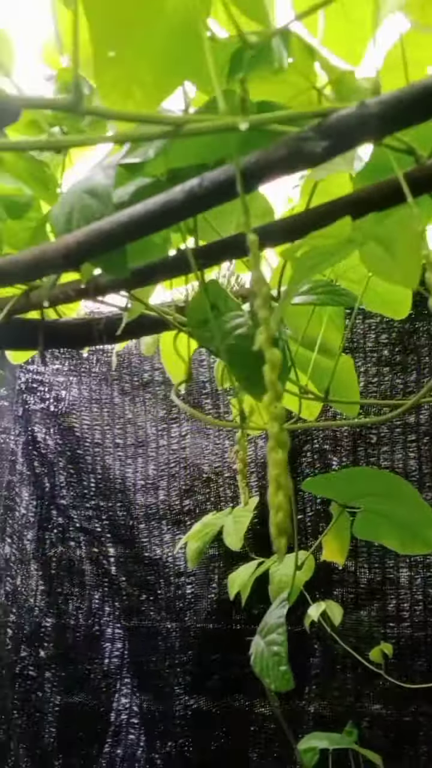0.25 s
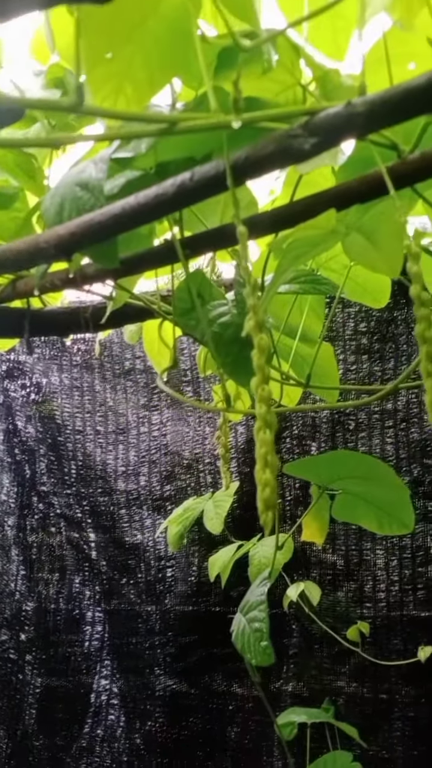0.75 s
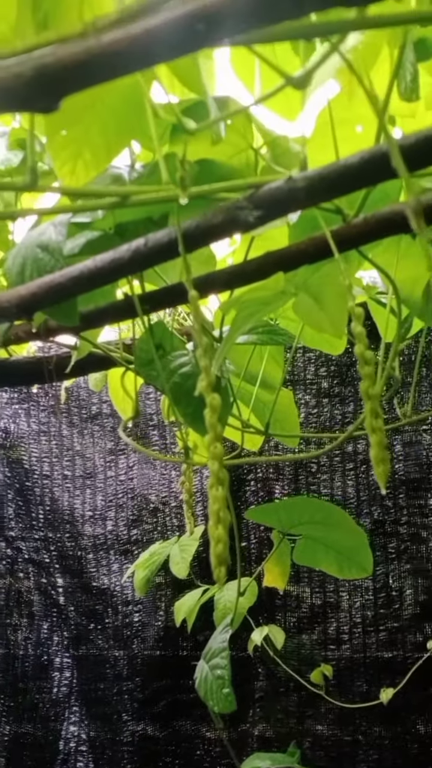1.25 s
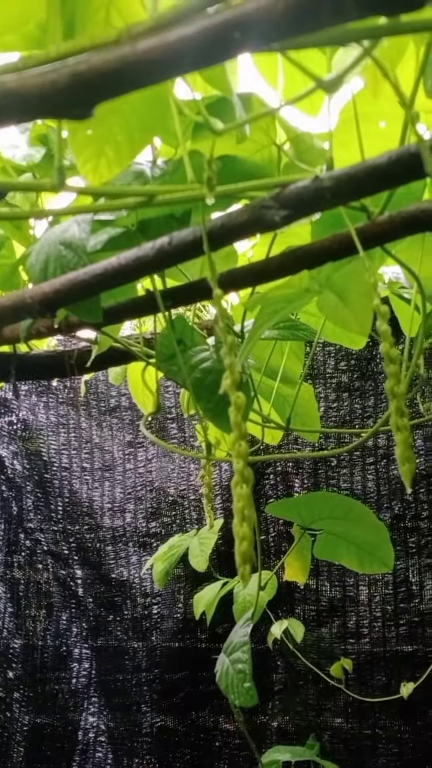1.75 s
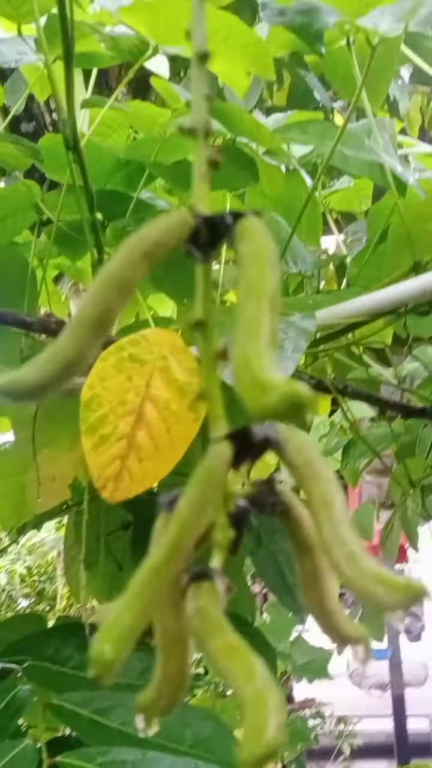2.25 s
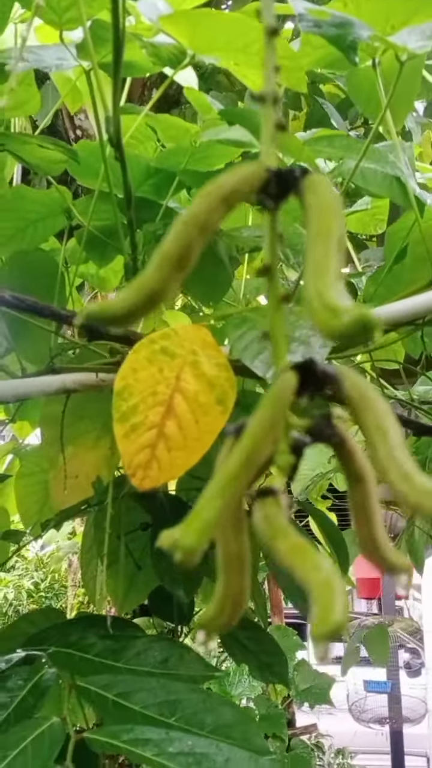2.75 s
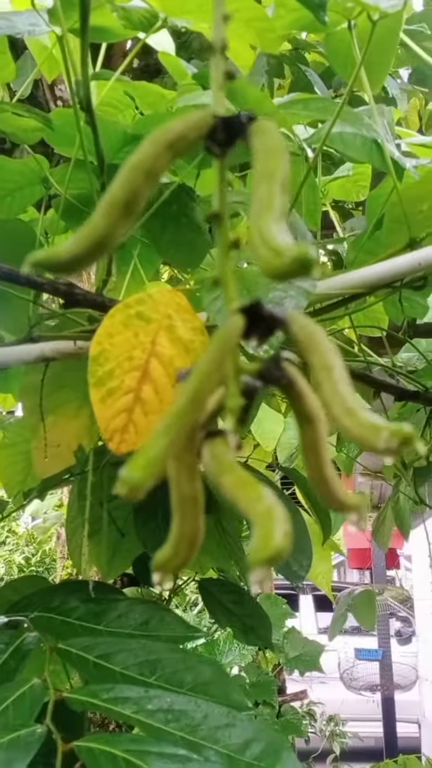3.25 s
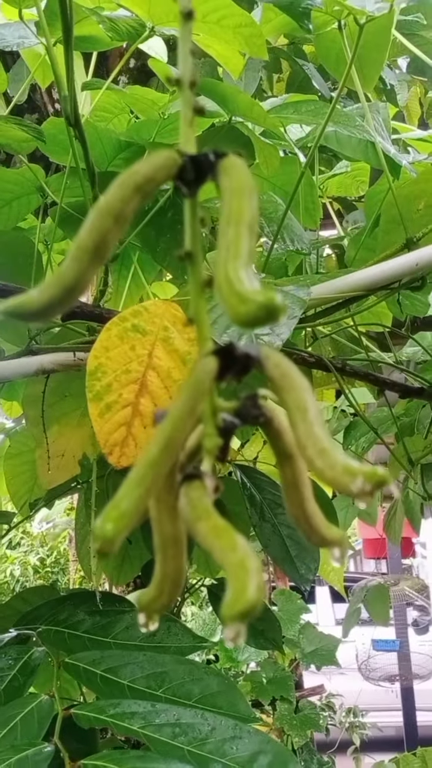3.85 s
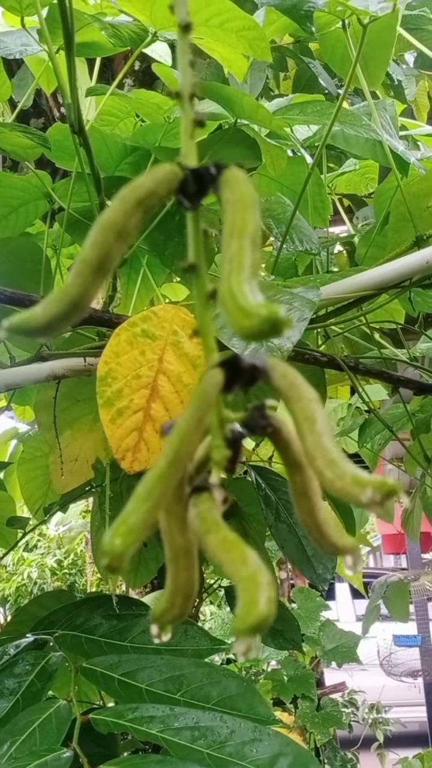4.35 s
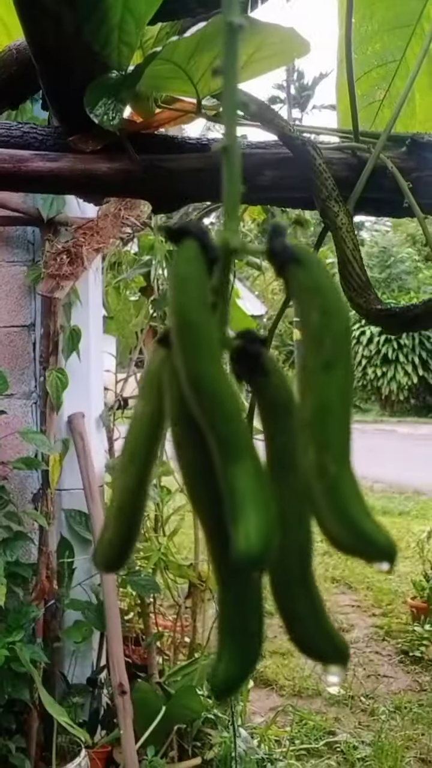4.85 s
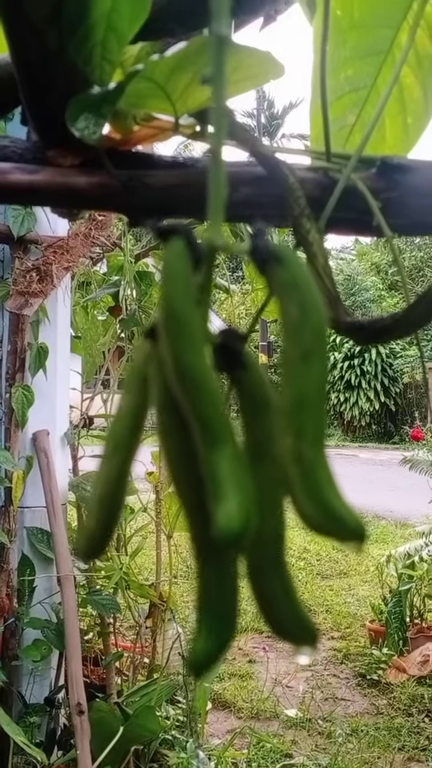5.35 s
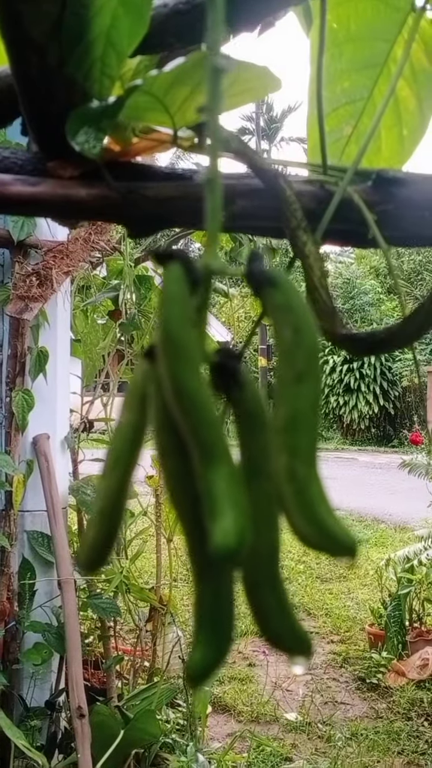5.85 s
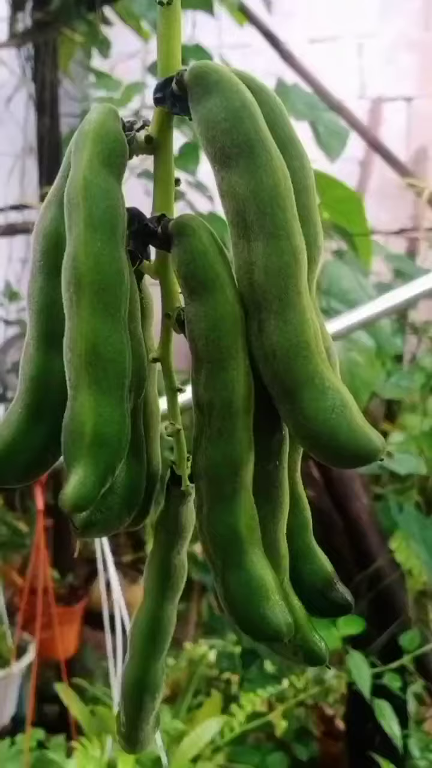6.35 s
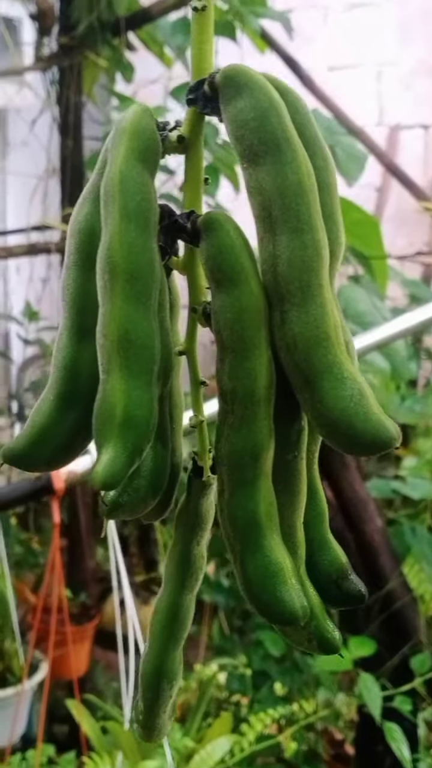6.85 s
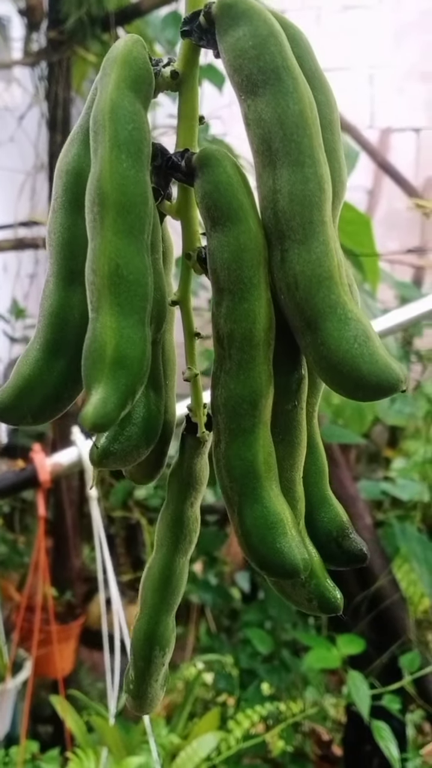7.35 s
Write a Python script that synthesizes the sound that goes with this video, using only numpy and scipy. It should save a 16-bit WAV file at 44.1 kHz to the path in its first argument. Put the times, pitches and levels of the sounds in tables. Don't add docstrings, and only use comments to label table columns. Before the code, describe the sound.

A quiet outdoor garden begins with a thin, high simmer of far insects and barely audible peeps. At about 0.8 s a near cricket starts a very fast, shrill, steady trill, around 6.6 kHz, dominating until everything cuts dead at 1.9 s. After about 0.2 s of silence the sound fades back quickly, the trill slightly softer. Far birds scold in short raspy bursts from 2.6 to 3.7 s, then clear sliding whistles chirp until the cut near 4.4 s. From 4.6 s closer rasping scolds come quickly, with a swooping, trilled warble at 5.1 s, whistles, and a faint sagging rooster crow until about 5.7 s. Another gap falls at 6.2 s. From 6.4 s scolds and whistles resume, a second warble sounds at 7 s, a faint low motor hum pulses, and the cricket stops around 7.4 s, before the end at 7.7 s.

```python
import sys
import numpy as np
from scipy import signal
from scipy.io import wavfile
from scipy.ndimage import uniform_filter1d

SR = 44100
rng = np.random.default_rng(int(sys.argv[2]) if len(sys.argv) > 2 else 0)


def int16_out(signal):
    q = np.round(np.clip(np.atleast_2d(signal).T, -1, 1) * 32767)
    wavfile.write(sys.argv[1], SR, q.astype(np.int16))


def invert_db(level):
    return 10 ** (np.asarray(level, dtype=float) / 20)


N = 335160

# start t/s, end t/s, background level/dB, traffic rumble level/dB
TAKES = [
    (-1, 1.912, -80.5, -81),
    (2.104, 4.3717, -81, -86),
    (4.618, 6.178, -81, -80),
    (6.435, 7.7, -80, -84),
]
# main arrival t/s, last stroke t/s, stroke rate/Hz, carrier f/Hz, octave level/dB
TRILLS = [
    (.8054, 1.95, 38.987, 6640, 5),
    (2.1097, 4.4, 38.987, 6630, -3),
    (4.6199, 6.2, 38.88, 6660, -7),
    (6.4501, 7.44, 38.945, 6650, -5),
]
# delay/ms, level/dB, half width/ms
ARRIVALS = [
    [(-.5, -0.5, 1.6), (4.0, -1.5, 2.2), (10.5, -8.5, 1.7), (17.5, -8.5, 1.2), (21.0, -16, 1.5)],
    [(-3.9, -4, 1.7), (0, 0, 1.4), (4.5, -3, 1.6), (13, -8, 1.6), (16.5, -7, 1.8)],
    [(-9.5, -10, 1.4), (-5.5, -4.5, 1.9), (.3, 0, 2.16), (5.5, -7, 1.9), (10.5, -11.5, 1.8)],
    [(.1, 0, 2.77), (7.2, -2.5, 1.2), (12.4, -9, 1.4), (18.2, -7, 1.5), (21.4, -7.5, 1.3)],
]
# t/s, level/dB
CRICKET_LEVEL = [(.8, -45.5), (1.1, -44), (1.75, -42), (1.9, -43), (2.1, -47.5), (3, -46), (5.4, -46),
                 (6.2, -46), (7.4, -48)]
# t/s, length/s, from f/Hz, to f/Hz, peak level/dB
FALLS = [(0.984, .085, 2130, 2027, -72), (1.63, 0.095, 1850, 1730, -75.5), (2.95, .1, 1020, 900, -81),
         (3.826, .011, 3250, 2550, -52.5), (4.67, 0.033, 3535, 3230, -57.5), (4.76, .07, 2520, 2150, -66.5),
         (7.097, .025, 2300, 2100, -69), (4.136, 0.049, 2320, 2150, -58), (4.868, .045, 2453, 1900, -59.5),
         (4.912, .05, 1786, 1670, -68.5), (5.505, .082, 2996, 1900, -43), (5.563, .055, 897, 729, -57.5),
         (5.584, .155, 760.6, 660.6, -57), (5.791, 0.055, 2293, 2007, -54),
         (6.529, 0.032, 3480, 3050, -59.5), (6.731, .055, 2406, 1704, -57.5),
         (7.359, 0.042, 2960, 2510, -57), (4.04, .08, 3094, 2503, -47.5)]
# t/s, length/s, from f/Hz, to f/Hz, peak level/dB
RISES = [(4.013, 0.037, 2780, 3090, -49), (3.804, .025, 2880, 3320, -52.5), (4.181, .06, 2510, 2940, -44),
         (4.33, 0.068, 3000, 3531, -43), (4.363, .016, 3700, 4150, -46.5),
         (4.637, 0.049, 3250, 3550, -49.5), (4.958, 0.039, 1660, 1720, -60),
         (5.728, .08, 1950, 2310, -54.5), (6.013, .09, 2250, 2595, -49), (6.497, 0.043, 3280, 3466, -53.5),
         (6.565, .065, 2100, 2460, -56.5), (7.146, .016, 4000, 4290, -62), (6.963, 0.013, 3200, 3900, -62)]
# t/s, length/s, from f/Hz, to f/Hz, peak level/dB
SLIDES = [
    (.94, .06, 2250, 2120, -81.5),
    (1.38, .13, 2540, 2070, -78),
    (3.16, .22, 7450, 8400, -69),
    (3.769, 0.043, 2810, 2970, -57.5),
    (4.06, 0.084, 2966, 2250, -49.5),
    (7.375, .062, 2750, 1760, -56),
    (4.7, 0.063, 2000, 2560, -62.5),
    (6.781, .11, 1647, 1862, -64),
]
# t/s, length/s, f/Hz, peak level/dB
PEEPS = [(.1, .5, 5230, -93), (.275, .07, 3630, -71), (.35, .11, 3580, -76), (.44, .075, 3880, -77.5),
         (.525, .06, 3870, -83), (6.62, .025, 3420, -64), (6.6, .11, 2470, -62), (6.52, .1, 3440, -58.5),
         (4.75, 0.033, 2520, -60), (4.93, .07, 1450, -71.5), (1.2, .11, 3640, -83), (2.14, 0.18, 3400, -85),
         (4.62, .22, 3900, -79), (4.762, .045, 1490, -63.5), (4.865, .08, 1480, -66), (4.9, .045, 825, -67),
         (5.14, .06, 625, -82.5), (5.685, 0.037, 1590, -70.5), (5.882, 0.041, 2920, -55),
         (6.438, .05, 2960, -73), (6.46, .04, 1920, -79), (6.05, .18, 2614, -46.5),
         (1.495, 0.091, 2110, -76)]
# t/s, swoop level/dB, trill level/dB, trill growth/(dB/s), trill depth f/Hz, swoop head level/dB
WARBLES = [
    (5.113, -38, -42, -21, 310, -7.5),
    (6.973, -39, -65.5, 59.5, 270, -3),
]
# t after start/s, centre f/Hz, share of depth, level/dB
TRILL_PATH = [
    (.063, 3017, .1, 0),
    (.08, 2840, .55, 1),
    (.11, 2754, .95, -3),
    (.14, 3001, 1.1, -1),
    (.175, 3330, .8, 2.5),
    (.195, 3340, .6, -14.5),
]
# t/s, peak level/dB, throat f/Hz, chest level/dB, top level/dB
SCOLDS = [(4.7351, -43, 5460, -14, -54), (4.8516, -40.5, 4770, -5, -49), (5.1058, -37, 5860, -13, -51),
          (5.2134, -41, 4360, -16, -43.5), (5.347, -40.5, 5620, -20, -51), (5.441, -37, 5630, -26, -49),
          (5.5444, -36.5, 5800, -21, -45), (5.6764, -38.5, 5750, -16.5, -54),
          (5.7968, -33, 5650, -24, -39.5), (5.8844, -33, 6050, -21, -38), (5.9833, -37, 4400, -18.5, -42.5),
          (6.11, -38, 5990, -23, -49), (6.4667, -51, 5600, -23, -43), (6.564, -42.5, 5640, -16.5, -51),
          (6.6478, -43.5, 6150, -23, -49), (6.7551, -40.5, 5740, -21.5, -51.5)]
# t/s, peak level/dB, throat f/Hz, chest level/dB, low level/dB
FAR_SCOLDS = [(2.614, -50.5, 4450, -12, -22), (3.0974, -50.5, 4140, -16.5, -15.5),
              (3.1986, -59.5, 3640, -4, -11.5), (3.3049, -54, 3530, -6, -13.5),
              (3.3862, -52.5, 4520, -8, -11), (3.4644, -48.5, 4570, -8.5, -20),
              (3.5444, -48.5, 4200, -7, -14.5), (3.6506, -47.5, 4270, -6.5, -20),
              (4.135, -51.5, 5100, -11, -30.5), (4.17, -48.5, 5500, -9, -30.5)]
# f/Hz, level/dB, f/Hz, level/dB
THROATS = [(3800, -3.5, 5100, -9), (6060, -3, 3230, -4), (5940, 0, 5170, -9), (5045, -5, 4440, -6),
           (5900, 0.5, 4110, -2), (5291, -2, 5980, -5), (5960, -4, 5180, -6), (3820, -0.5, 5960, -6),
           (4410, -2, 6500, -3.5), (4400, -2.5, 3600, -4), (4800, -7, 6030, -14), (5200, -0.5, 5820, -1.5),
           (5380, -3.5, 4930, -6), (4880, -1.5, 6500, -4), (4890, 0.5, 4000, -7), (4940, -7.5, 4370, -10),
           (4790, -3, 3700, -12.5), (3900, -4, 4350, -6), (4400, -6, 4860, -8), (4800, -5.5, 5430, -8),
           (6100, 2, 5700, -2.5), (5350, -7, 4400, -11.5), (4650, -5, 3300, -17), (6100, -7, 5400, -14),
           (5510, -4, 4810, -10.5), (4300, -9, 5400, -9)]
# middle t/s, level/dB, low f/Hz, high f/Hz, half length/s
RUSTLES = [(0.33, -79.5, 3900, 5000, .07), (4.76, -63.5, 3350, 3600, .07), (1.24, -83, 3700, 5000, .07),
           (2.22, -75.5, 3120, 3800, 0.067), (2.197, -76.5, 4300, 5100, .06),
           (2.77, -71.5, 3310, 3820, .05), (2.76, -71.5, 4300, 4930, .045),
           (2.85, -72.5, 4350, 4600, 0.035), (2.84, -75, 3200, 3700, .03), (2.9, -78.5, 3800, 4150, 0.054),
           (2.72, -81.5, 1550, 1700, .03), (1.543, -78.5, 2000, 2400, .045), (1.28, -84, 2900, 3300, .02),
           (.33, -76.5, 3450, 3700, .07), (1.24, -80.5, 3500, 3700, .04), (1.17, -87, 3800, 3950, .06),
           (7.122, -49, 2950, 3680, .007), (7.09, -55, 2700, 3500, .01), (7.44, -68, 2030, 2900, .045),
           (4.75, -70, 2550, 3100, .1), (3.72, -77.5, 1550, 2000, .06), (3.96, -76.5, 1500, 2200, .04),
           (6.8, -67.5, 1600, 2300, 0.044), (3.13, -70, 900, 2700, 0.033), (3.17, -70.5, 980, 1520, 0.052),
           (3.58, -74, 1600, 2000, .05), (3.42, -64.5, 3160, 4300, .035), (3.23, -66.5, 3140, 3900, .03),
           (4.22, -79, 1650, 1850, 0.055), (5.39, -58, 3000, 3680, .055), (6.66, -70, 3300, 3600, .04),
           (3.23, -78.5, 1300, 2200, 0.036), (3.96, -72, 1500, 5400, 0.022), (4.2, -61.5, 3300, 6000, .045),
           (4.17, -84, 11500, 14500, .02), (1.595, -78.5, 5150, 5260, .12), (6.75, -77.5, 800, 1200, .04),
           (4.9, -70.5, 1350, 2300, 0.09), (7.55, -76.5, 3530, 4700, .06)]
# middle t/s, level/dB, low f/Hz, high f/Hz, half length/s
MORE_RUSTLES = [(3.121, -73.5, 1700, 2700, 0.027), (3.896, -68, 2740, 3140, 0.054),
                (4.23, -65.5, 2120, 2780, 0.052), (4.303, -76, 4300, 4550, .04), (5.058, -78, 1400, 1510, 0.053),
                (5.69, -70.5, 1490, 2200, 0.037), (6.588, -74.5, 1860, 2160, 0.047),
                (7.074, -54.5, 2600, 3000, 0.023), (7.139, -51.5, 3000, 3520, 0.013),
                (7.19, -68.5, 2870, 3720, 0.018), (7.401, -60.5, 2310, 2940, .015), (7.419, -60, 1870, 2500, .012)]
# middle t/s, half length/s, first partial level/dB, second level/dB
CROW_SWELLS = [(4.715, 0.062, -71, -86), (4.761, 0.039, -73, -63.5), (4.87, .06, -83, -72.5),
               (5.07, 0.063, -66, -67.5), (5.136, .05, -74.5, -57.5), (5.23, .05, -85, -67),
               (5.35, .05, -83, -60.5), (5.423, 0.032, -66, -57), (5.507, .035, -69.5, -63),
               (5.582, .04, -67, -55)]
# chorus, katydid and hiss level/dB, katydid throb top t/s, steady insect level/dB
INSECTS = [
    (-53.5, -72.5, -83.5, .67, -79.5),
    (-57, -75.5, -90.5, 2.23, -75),
    (-57.5, -88.5, -95, 4.7, -85.5),
    (-60.5, -88, -96.5, 5.6, -87),
]
# f/Hz, density level/dB
BACKGROUND_COLOUR = [(150, -2.5), (500, -13), (800, -13), (1400, -13), (2170, -19.5), (3460, -17),
                     (5000, -19.5), (6500, -48)]
# t/s, f/Hz, level/dB
MOTOR_HUM = [
    (6.8, 82.4, -85.5),
    (6.888, 83, -65.5),
    (7.03, 83.2, -66.5),
    (7.284, 85.2, -62.5),
    (7.6, 85, -60.5),
]
# low f/Hz, high f/Hz, level under the cricket/dB
DROPOUT_BANDS = [
    (7300, 7620, -42.5),
    (7620, 8250, -45),
    (9160, 9750, -50),
]


def rms_one(x):
    return x / np.sqrt(np.mean(x ** 2) + 1e-20)


def band(x, low_hz, high_hz, order=4):
    return signal.sosfilt(signal.butter(order, [low_hz, high_hz], "band", fs=SR, output="sos"), x)


def drift(rate, at=slice(None)):
    r = np.exp(-80 * np.pi * rate / SR)
    slow = signal.lfilter([1], [1, -2 * r, r * r], rng.standard_normal(N // 40 + 2002))[2000:]
    return np.interp(np.arange(N)[at] / 40, np.arange(len(slow)), rms_one(slow))


def in_time(rows):
    s, *columns = np.transpose(rows)
    return [np.interp(np.arange(N) / SR, s, c) for c in columns]


def per_take(rows):
    take = np.searchsorted(np.array(TAKES)[:, 0], np.arange(N) / SR) - 1
    return np.array(rows)[take].T


def scatter(x, t60_s):
    t = np.arange(SR // 2) / SR
    near = invert_db(-60 * t / t60_s - (t / .07) ** 4)
    far = invert_db(-25 - 60 * t / 1)
    tail = rng.standard_normal(len(t)) * (near + far) * np.minimum(t / 0.0089, 1)
    return signal.fftconvolve(x, tail / np.linalg.norm(tail))[:N]


def voice(rows, flutter_db, edge_s=0.0033):
    s, *columns = np.transpose(rows)
    at = np.arange(max(round(s[0] * SR), 0), min(round(s[-1] * SR), N))
    hz, *levels = [np.interp(at / SR, s, c) for c in columns]
    phase = 2 * np.pi * np.cumsum(hz) / SR
    ends = np.clip(np.minimum(at - at[0], at[-1] - at) / (edge_s * SR), 0, 1)
    partials = sum(invert_db(db + flutter_db[at]) * np.sin((k + 1) * phase) for k, db in enumerate(levels))
    out = np.zeros(N)
    out[at] = np.sqrt(2) * ends * partials
    return out


def cricket(wander=.9, uneven_db=1.74, octave_db=-99):
    sweep_hz, sweep_top_turns = 65.4, .71
    warm_up_hz, warm_up_s = 130, .05
    early_turns = .25
    seconds, out = np.arange(N) / SR, np.zeros(N)
    level_db, = in_time(CRICKET_LEVEL)
    takes = np.searchsorted(np.array(TAKES)[1:, 0] * SR, np.arange(N))
    for take, ((first, last, rate, hz, _), arrivals) in enumerate(zip(TRILLS, ARRIVALS)):
        on = takes == take
        t = seconds[on]
        warming = np.exp(-np.abs(t - TRILLS[0][0]) / warm_up_s)
        turns = (t - first) * rate + 0.011 * drift(6, on) + early_turns * warming
        sweep = sweep_hz * np.cos(2 * np.pi * (turns - sweep_top_turns))
        phase = 2 * np.pi * np.cumsum(hz - warm_up_hz * warming + sweep) / SR + wander * drift(9, on)
        stroke = 0
        for k, (delay_ms, db, width_ms) in enumerate(arrivals):
            apart_ms = ((turns - delay_ms * rate / 1000 + .5) % 1 - .5) * 1000 / rate
            shape = invert_db(db + uneven_db * drift(25, on)) * np.exp(-(apart_ms / width_ms) ** 2 / 2)
            stroke = stroke + shape * np.sin(phase - 2.51 * k + .45 * drift(20, on))
        sounding = np.clip(np.minimum(t - first + .017, last - t) / .004, 0, 1)
        out[on] = rms_one(stroke) * sounding
    out += invert_db(-13) * scatter(out, .12)
    doubled = invert_db(level_db) * out * (out + .4 * rng.standard_normal(N))
    octave = rms_one(band(doubled, 13150, 13550))
    return invert_db(level_db) * out + invert_db(octave_db + per_take(TRILLS)[-1]) * octave


def whistle(s, length_s, from_hz, to_hz, db, shape):
    top, start_db, end_db, settle = shape
    u = np.linspace(0, 1, 25)
    swell_curve = 1.62
    before_db = start_db * np.abs(1 - u / top) ** swell_curve
    after_db = end_db * np.abs((u - top) / (1 - top)) ** swell_curve
    hz = to_hz + (from_hz - to_hz) * (1 - u) ** settle
    return np.transpose([s + length_s * u, hz, db - np.where(u < top, before_db, after_db)])


def warble(s, swoop_db, trill_db, growth_db, depth_hz, head_db):
    from_hz, to_hz, settle_s, swoop_s = 4150, 3080, .025, .063
    break_s, break_db, break_half_s = .015, 10, 0.0035
    at, *path = np.transpose(TRILL_PATH)
    t = np.arange(0, at[-1], 1 / 1000)
    centre_hz, share, db = [np.interp(t, at, c) for c in path]
    swoop_hz = to_hz + (from_hz - to_hz) * np.exp(-(t / settle_s) ** 1.9)
    swing = share * np.cos(2 * np.pi * 33.5 * (t - .084))
    trill_hz = centre_hz + depth_hz * swing
    voice_break = break_db * np.exp(-((t - break_s) / break_half_s) ** 2)
    swoop_db = swoop_db + head_db * np.exp(-(t / .02) ** 4) - voice_break - 60 * t
    trill_db = trill_db + db + growth_db * (t - swoop_s) + 4 * swing
    over = np.clip((t - swoop_s) / .007 + .5, 0, 1)
    return np.transpose([s + t, swoop_hz + over * (trill_hz - swoop_hz),
                         swoop_db + over * (trill_db - swoop_db)])


def songbirds():
    fall_shape, rise_shape = (.28, 16, 24, 1.05), (0.6, 24, 10, 2.8)
    slide_shape, peep_shape = (.66, 7.6, 16, .85), (.35, 17, 20, 1.1)
    peep_sag = .012
    flutter_db = 2.1 * drift(50)
    notes = [whistle(*row, fall_shape) for row in FALLS]
    notes += [whistle(*row, rise_shape) for row in RISES]
    notes += [whistle(*row, slide_shape) for row in SLIDES]
    notes += [whistle(s, length_s, hz, hz * (1 - peep_sag), db, peep_shape) for s, length_s, hz, db in PEEPS]
    notes += [warble(*row) for row in WARBLES]
    return sum(voice(note, flutter_db) for note in notes)


def scolding(pulse_hz=400, jitter=.022, droop=.8, breath=.05, length_s=0.044):
    wide_db, spill_db = -1, -16
    peak_db, peak_half_hz, peak_s = 5, 130, .017
    grain_db = 3.5
    opening_s_per_khz = 0.0035
    near_low_db, far_top_db = -36, -43
    out = np.zeros(N + SR)
    t = np.arange(SR // 8) / SR
    fading = np.exp(-(t / length_s) ** 2.6)
    bursts = [(*row, far_top_db) for row in FAR_SCOLDS]
    bursts += [(*row[:-1], near_low_db, row[-1]) for row in SCOLDS]
    for (s, db, hz, chest_db, low_db, top_db), (hz2, db2, hz3, db3) in zip(bursts, THROATS):
        steps = rng.standard_normal(len(t) // 100 + 2).repeat(100)
        wobble = .05 * steps[-1] + jitter * steps[:len(t)] - droop * t
        turns = np.cumsum(pulse_hz * (1 + wobble)) / SR
        pulses = np.diff(np.floor(turns), prepend=0) * invert_db(grain_db * steps[1:len(t) + 1])
        source = pulses + breath * rng.standard_normal(len(t))
        peaks = [(peak_db + side_db - t / peak_s * 4.3, peak_hz - peak_half_hz, peak_hz + peak_half_hz)
                 for peak_hz, side_db in ((hz, 0), (hz2, db2), (hz3, db3))]
        parts = [(wide_db - 3, 5250, 6250), (wide_db - 5.0, 4300, 5250), (chest_db + 3.5, 3200, 4200),
                 (low_db + 5.5, 1640, 1860), (low_db + 5, 1930, 2180), (top_db + 6, 11300, 14200),
                 (spill_db - 10, 2250, 3300), (spill_db - 7.5, 3300, 4300), (spill_db - 13, 7200, 9200)]
        at = round((s - .0095) * SR)
        for part_db, low, high in peaks + parts:
            late_s = opening_s_per_khz * np.clip(5.6 - low / 1000, 0, 2.4)
            rising = np.clip((t - late_s) / .009, 0, 1) ** 1.3
            rasp = rms_one(band(source, low, high, order=3))
            out[at:at + len(t)] += invert_db(db - 12.5 + part_db) * rising * fading * rasp
    return out[:N]


def rustles():
    grain, out = rng.standard_normal(N) * invert_db(3 * drift(50)), np.zeros(N)
    for s, db, low_hz, high_hz, half_s in RUSTLES + MORE_RUSTLES:
        at = np.arange(max(round((s - 2 * half_s) * SR), 0), min(round((s + 2 * half_s) * SR), N))
        swell = np.exp(-((at / SR - s) / half_s) ** 2)
        out[at] += invert_db(db) * swell * rms_one(band(grain[at], low_hz, high_hz))
    return out


def crow():
    start_s, end_s, floor_db = 4.62, 5.74, -94
    s = np.arange(start_s, end_s, 1 / 200)
    since = s - s[0]
    hz = 972.7 + 35 * np.exp(-since / .07) - 89.9 * since ** 2.3
    swells = sum(invert_db(np.array(db))[:, None] * np.exp(-((s - middle) / half_s) ** 2)
                 for middle, half_s, *db in CROW_SWELLS)
    levels_db = 20 * np.log10(swells + invert_db(floor_db)) + 1.5
    return voice(np.transpose([s, hz, *levels_db]), 3.2 * drift(28))


def far_insects():
    t = np.arange(N) / SR
    chorus_db, katydid_db, hiss_db, throb_s, steady_db = per_take(INSECTS)
    clicks = rng.standard_normal(N) * invert_db(1.6 * drift(60))
    chorus = band(clicks, 6700, 7068) + invert_db(-6) * band(clicks, 6250, 6750)
    chorus += invert_db(-23) * band(clicks, 5800, 6250, order=3) + invert_db(-31) * band(clicks, 5150, 5800, order=3)
    throb = invert_db(5.5 * np.cos(2 * np.pi * 7.15 * (t - throb_s)))
    throb *= invert_db(3 * np.cos(2 * np.pi * 117 * t + 1.4 * drift(3)))
    rasp = band(rng.standard_normal(N), 7750, 9000) + 1.4 * band(clicks, 8300, 8700, order=2)
    katydid = rms_one(throb * rasp)
    white = rng.standard_normal(N) * invert_db(1.3 * drift(8))
    steady = rms_one(invert_db(3.5 * drift(8.3) + 2.3 * drift(30)) * band(white, 8300, 9050))
    low_hiss = invert_db(3 * drift(25)) * band(white, 9700, 10300) + invert_db(3 * drift(25)) * band(white, 10300, 10900)
    high_hiss = band(white, 11000, 16500) + 2.2 * band(white, 14500, 15700)
    hiss = rms_one(low_hiss) + invert_db(-9.5) * rms_one(high_hiss)
    insects = invert_db(chorus_db) * rms_one(chorus) + invert_db(katydid_db) * katydid
    return insects + invert_db(hiss_db) * hiss + invert_db(steady_db) * steady


def background(level_db, rumble_db):
    edges = 150 * 2 ** np.arange(0, 5.6, .5)
    white, air = rng.standard_normal((2, N)), 0
    hz_points, db_points = np.transpose(BACKGROUND_COLOUR)
    for k, (low, high) in enumerate(zip(edges, edges[1:])):
        db = np.interp(np.log(low * high) / 2, np.log(hz_points), db_points)
        air = air + invert_db(db + 1.8 * drift(7)) * band(white[k % 2], low, high, order=2)
    rumble = invert_db(rumble_db + 2.5 * drift(6)) * rms_one(band(rng.standard_normal(N), 64, 150, order=2))
    beat_db = 4 * np.cos(2 * np.pi * 10.9 * (np.arange(N) / SR - 7.2))
    hum = voice(MOTOR_HUM, 1.5 * drift(8) - 1.5 + beat_db, edge_s=.03)
    return invert_db(level_db) * rms_one(air) + rumble + hum


def dropouts(x):
    hz, _, frames = signal.stft(x, SR, nperseg=1024)
    power = uniform_filter1d(np.abs(frames) ** 2, size=3)
    loud = power[(hz > 6200) & (hz < 7100)].sum(axis=0)
    for low_hz, high_hz, under_db in DROPOUT_BANDS:
        rows = (hz > low_hz) & (hz <= high_hz)
        frames[rows] = frames[rows] * (power[rows].sum(axis=0) > invert_db(2 * under_db) * loud)
    return signal.istft(frames, SR, nperseg=1024)[1][:N]


def scene():
    start, _, background_db, rumble_db = per_take(TAKES)
    song, scold, rooster = songbirds(), scolding() + rustles(), crow()
    tails = invert_db(-5) * scatter(song + invert_db(-9.5) * rooster, .3)
    tails += invert_db(-3) * scatter(scold, .33)
    fade_in_s = .25
    fade = np.clip((np.arange(N) / SR - start) / fade_in_s + 0.054, 0, 1)
    steady = cricket() + far_insects() + background(background_db, rumble_db)
    return (song + rooster + scold + fade * (tails + steady))[None]


def top_cut(x):
    return signal.sosfilt(signal.butter(12, 15700, fs=SR, output="sos"), x)


def record(dry):
    end = per_take(TAKES)[1]
    gate = np.arange(N) / SR < end
    low_pass = signal.cheby2(10, 60, 15900, fs=SR, output="sos")
    mix = signal.sosfilt(low_pass, dropouts(dry[0])[None] * gate)
    return top_cut(mix)


dry = scene()
out = record(dry)
int16_out(out)
```